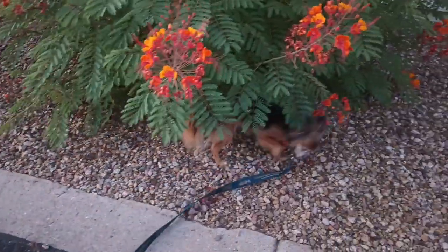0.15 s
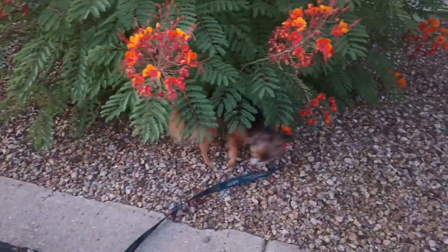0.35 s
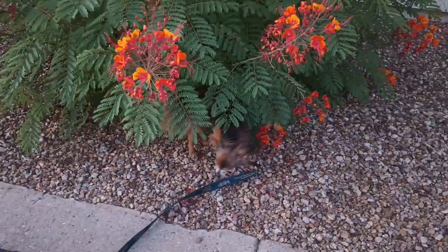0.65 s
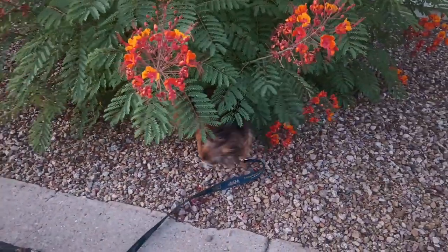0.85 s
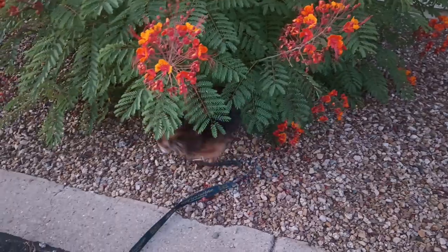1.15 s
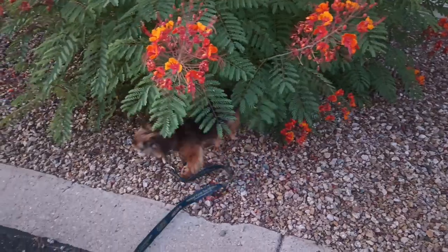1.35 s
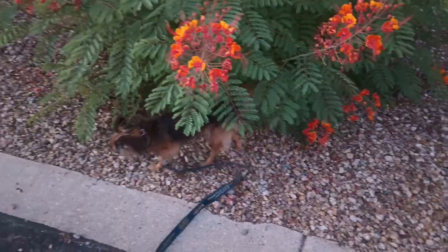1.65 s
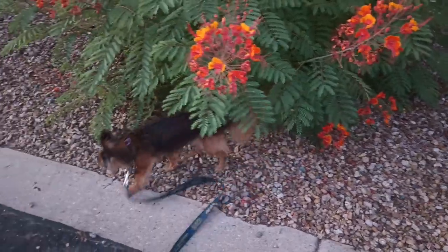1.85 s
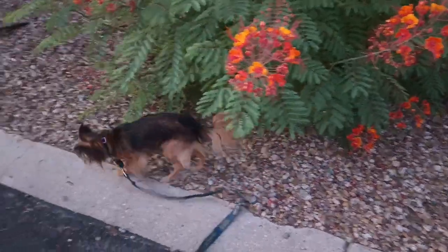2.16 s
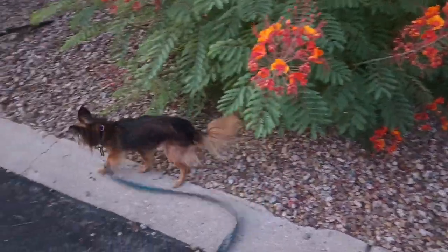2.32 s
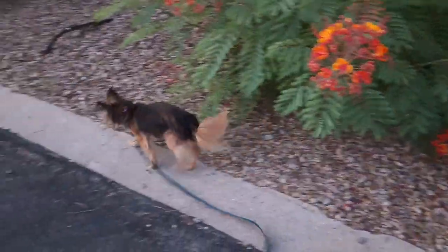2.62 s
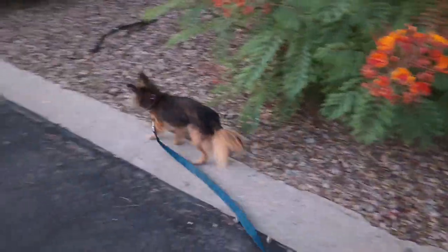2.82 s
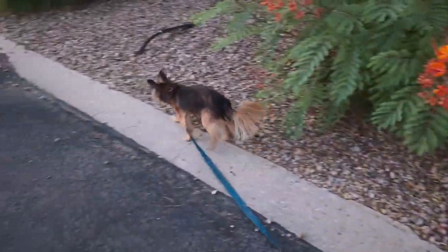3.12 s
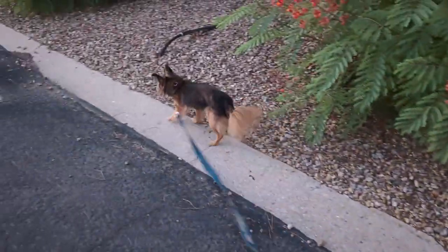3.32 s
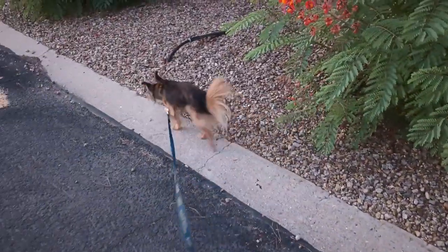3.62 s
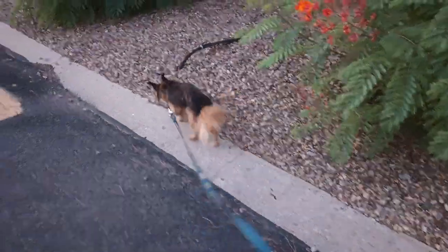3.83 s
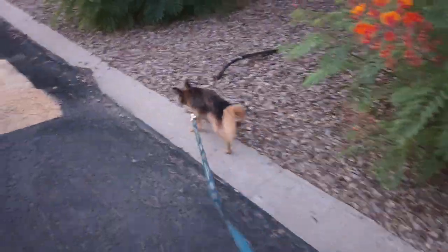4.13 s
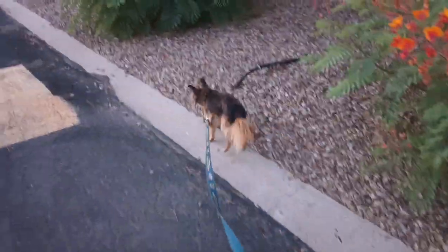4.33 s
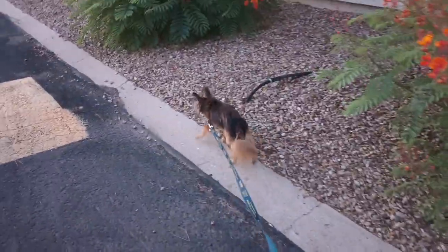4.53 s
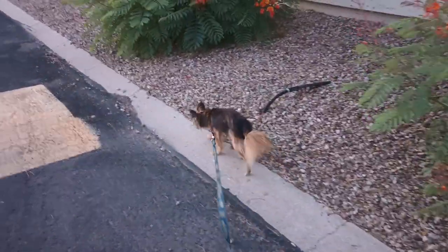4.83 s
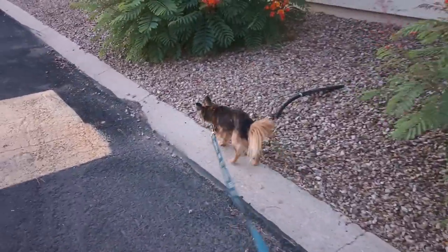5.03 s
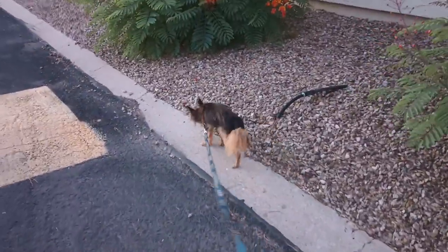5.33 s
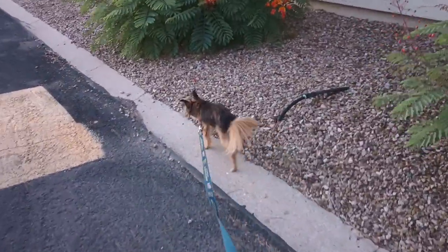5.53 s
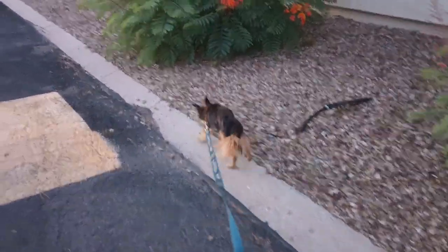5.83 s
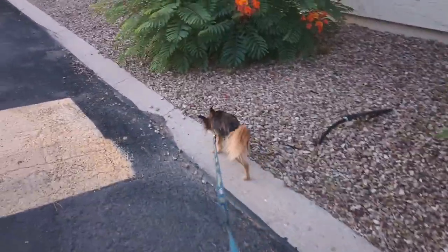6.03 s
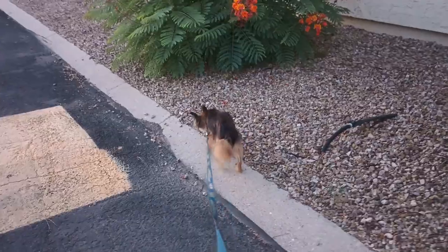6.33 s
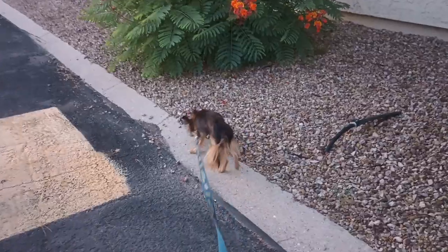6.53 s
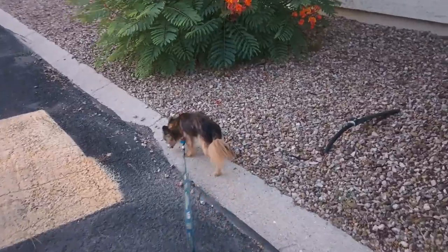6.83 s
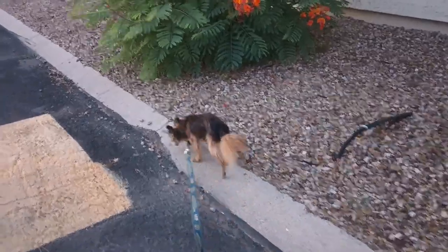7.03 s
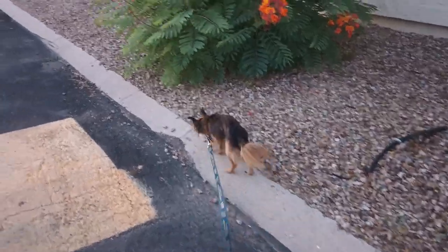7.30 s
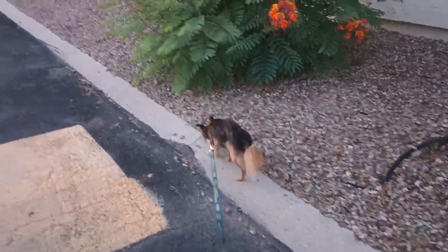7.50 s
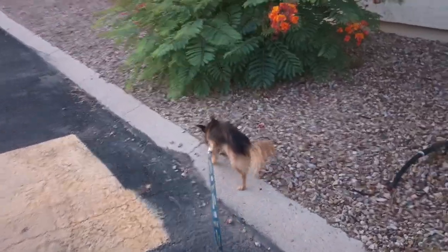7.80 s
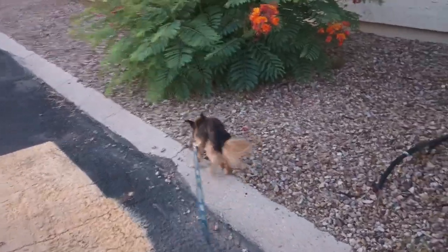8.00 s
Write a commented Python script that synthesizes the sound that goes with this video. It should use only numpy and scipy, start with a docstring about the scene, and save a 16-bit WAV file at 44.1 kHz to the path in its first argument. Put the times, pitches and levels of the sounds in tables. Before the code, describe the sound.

A small dog on a leash steps over gravel beside a quiet street, with sharp ticks of pebbles, claws and the leash clip and a light rustle. After about two seconds, wind starts buffeting the microphone with uneven low rumble and thumps. The collar tag rings faintly once, the ticks thin out, and the wind is loudest near the end. Far traffic and birds are barely audible.

```python
"""A breezy street, where a small dog on a leash steps from a gravel bed to the kerb. Wind leads: eddies
buffet the two microphone ports with rumble, flutter and thumps. Pebbles, claws and the leash clip tick
and bounce, stirred leaves and gravel rustle, a collar tag rings and shoes crush grit on asphalt.
Behind them, faint birds whistle and wheeze over a bed of far traffic."""
import sys
import numpy as np
from scipy import signal
from scipy.io import wavfile
from scipy.ndimage import uniform_filter1d

SR = 44100
rng = np.random.default_rng(int(sys.argv[2]) if len(sys.argv) > 2 else 0)


def transcribe(signal):
    """Save signal, clipped to [-1, 1], as a 16-bit WAV file at the path in sys.argv[1]."""
    frames = np.atleast_2d(signal).T
    limited = np.clip(frames, -1, 1)
    pcm = np.round(limited * 32767).astype(np.int16)
    wavfile.write(sys.argv[1], SR, pcm)


N = 359837


def from_db(db):
    """Decibels to gain."""
    return 10 ** (np.asarray(db) / 20)


def unit_rms(x):
    """Scale to an rms of one."""
    return x / np.sqrt(np.mean(x ** 2) + 1e-20)


def automation(rows):
    """Draw each column of a breakpoint table as a curve over the whole scene."""
    times, *columns = np.transpose(rows)
    return [np.interp(np.arange(N) / SR, times, column) for column in columns]


def eq_at(points, hz):
    """Read an EQ curve on a log-frequency axis."""
    freqs, levels = np.transpose(points)
    return np.interp(np.log(hz), np.log(freqs + 1), levels)


def band(x, low_hz, high_hz):
    """Butterworth band-pass."""
    sos = signal.butter(2, [low_hz, min(high_hz, 21000)], "band", fs=SR, output="sos")
    return signal.sosfilt(sos, x)


def resonance(x, hz, width_hz):
    """Two-pole peak of unit gain."""
    r = np.exp(-np.pi * width_hz / SR)
    gain = (1 - r * r) / 2
    return signal.lfilter([gain, 0, -gain], [1, -2 * r * np.cos(2 * np.pi * hz / SR), r * r], x)


def drift(rate_hz):
    """Smooth random modulator with an rms of one."""
    hop = 40
    r = np.exp(-2 * np.pi * hop * rate_hz / SR)
    slow = signal.lfilter([1], [1, -2 * r, r * r], rng.standard_normal(N // hop + 2002))[2000:]
    return np.interp(np.arange(N) / hop, np.arange(len(slow)), unit_rms(slow))


def uneven_hits(spread_db, shape):
    """Impulse strengths of either sign: mostly small, a few large."""
    return from_db(spread_db * np.minimum(rng.exponential(1, shape), 3)) * rng.choice([-1, 1], shape)


def panned(pan_db):
    """Constant-power left and right gains; pan is always left minus right."""
    pair = np.array([from_db(pan_db / 2), from_db(-pan_db / 2)])
    return pair / np.sqrt(np.mean(pair ** 2, axis=0))


# The dog's path across the stereo field: (time [s], left port delay [samples])
DOG_BEARING = [(0, 1), (1.2, -2), (2.2, -6), (2.8, -5), (3.7, 0), (5.2, 7), (6.2, 8), (7, 14), (8.16, 16)]

def place(out, start, sound, pan_db, left_only=0):
    """Mix in a panned one-shot, delayed between the ports by the dog's bearing."""
    lag = round(np.interp(start, *np.transpose(DOG_BEARING)))
    for port, gain, delay, part in zip(out, panned(pan_db), (lag, 0), (sound + left_only, sound)):
        i = round(start * SR) + delay
        port[i:i + len(part)] += gain * part[:N - i]


# The ride of the gusts: (time [s], level [dB], pan [dB])
GUSTS = [(0, -50.5, 32), (.12, -75, -6), (.7, -65.5, 13.5), (.92, -53.5, 7), (1.07, -67, 0), (2.06, -65, 0),
         (2.16, -42.5, 12), (2.58, -43, 13), (2.68, -56, 7), (2.9, -44, 33), (3.2, -53.5, 5),
         (3.32, -79, 19), (3.5, -52, 55), (3.62, -47.5, 22), (3.82, -65, -2.5), (3.91, -47, 22),
         (4.11, -76.5, -8), (4.27, -66, 1), (4.4, -38, -3), (4.6, -46.5, -2), (4.75, -56, 0.5),
         (4.85, -41.5, 8), (4.94, -43, 4), (5.0, -52, 1), (5.08, -43, -2), (5.4, -46, 0),
         (5.75, -55.5, 0.5), (6.0, -40, 7), (6.17, -62, -14), (6.24, -40, 8), (6.53, -41.5, 14),
         (6.62, -32, 14), (6.76, -37, -1.5), (6.9, -29, -6.5), (7.07, -31.5, -5), (7.18, -68, 7),
         (7.3, -24.5, 6.5), (7.55, -27.5, -3.5), (7.76, -45.5, 19), (7.84, -31, 4), (7.97, -38, 2),
         (8.05, -23, 11), (8.16, -41.5, -7.5)]
# Tone of the buffeting: (frequency [Hz], level [dB])
BUFFET_EQ = [(15, -53), (25, -13), (68, 12), (140, 8), (199, -7.5), (432, -25.5), (612, -28.5), (840, -65),
             (1100, -90), (1430, -86), (2420, -120)]
# The ride of the small, fast eddies: (time [s], level [dB])
EDDY_FLUTTER = [(0.0, -84.5), (2.04, -82), (2.36, -70), (2.39, -48), (2.5, -92), (4.34, -77), (4.39, -52.5),
                (4.61, -74.5), (6.07, -68.5), (6.45, -66.5), (6.48, -80.5), (6.68, -43.5), (6.73, -69),
                (6.95, -35), (7.0, -58), (7.07, -50), (7.2, -87), (7.32, -35), (7.54, -32.5), (7.73, -76.5),
                (7.79, -47), (7.82, -56.5), (7.86, -41.5), (7.93, -75.5), (8.05, -31.5), (8.16, -69)]

def wind(thumps, eddies_per_s=180, sway_db=7, bass_hz=90, split_hz=230):
    """Each port is struck by its own uneven train of eddies; large ones rumble, small ones flutter."""
    level_db, pan_db = automation(GUSTS)
    pan_db = pan_db + sway_db * drift(8)  # the wind swings between the ports
    flutter_db, = automation(EDDY_FLUTTER)
    edges = 25 * 2 ** np.arange(0, 5.5, 0.5)
    out = np.zeros((2, N))
    for port, gain, thump in zip(out, panned(pan_db), thumps):
        eddies = uneven_hits(4.6, (2, N)) * (rng.random(N) < eddies_per_s / SR)
        eddies += 0.029 * rng.standard_normal((2, N))
        large, small = np.zeros((2, N))
        for k, (low, high) in enumerate(zip(edges, edges[1:])):
            hz = np.sqrt(low * high)
            part = from_db(eq_at(BUFFET_EQ, hz)) * band(eddies[k % 2], low, high)
            if hz < bass_hz:  # faster wind makes smaller eddies, so the sub swells less
                part *= from_db(-0.1656 * (level_db + 40))
            if hz < split_hz:
                large += part
            else:
                small += part
        large, small = unit_rms(large), unit_rms(small)
        rumble = from_db(level_db + 0.5 * drift(4.1)) * large
        bursts = from_db(flutter_db - 2 + 4.9 * drift(28))
        shedding = uniform_filter1d(np.abs(large), size=300) ** 0.78  # strong eddies shed small ones
        port += gain * (rumble + bursts * shedding * small)
        port += from_db(-22.5) * uniform_filter1d(np.abs(thump), size=200) * small  # so do thumps
    return out


# The hardest single eddies: (time [s], level on the louder port [dB], pitch [Hz], pan [dB])
EDDY_THUMPS = [(0.054, -36, 100, 33), (0.954, -41.5, 118, 36), (2.143, -29, 127, 31), (2.241, -27, 119, 13),
               (2.327, -29, 152, 19), (2.39, -27, 247, 29), (2.398, -26.5, 109, -21), (2.441, -29, 150, 12),
               (2.717, -26, 126, 32), (2.763, -33, 100, 26), (2.873, -31.5, 117, 40), (2.986, -27, 128, 25),
               (3.097, -35, 91, -30), (3.222, -43.5, 112, 23), (3.521, -35, 98, 38), (3.583, -32, 105, 38),
               (3.657, -35, 97.5, 31), (3.689, -37, 110, 32), (3.903, -28.5, 91, 28),
               (4.049, -39.5, 91, -33), (4.401, -28.5, 155, 16), (4.413, -30, 131, -9),
               (4.515, -25, 135, -24), (4.657, -29, 104, 14), (4.818, -33, 112, -24), (4.86, -30, 131, 33),
               (4.917, -33.5, 120, -9), (5.088, -30, 117, -8), (5.184, -33, 116, 16),
               (5.376, -31, 137, -37), (5.476, -42, 212, 0), (5.581, -39.5, 125, 24),
               (5.651, -31.5, 118, 41), (5.889, -24.5, 153, 28), (5.999, -27, 158, 28),
               (6.054, -32.5, 119, -28), (6.234, -24, 150, 30), (6.305, -28, 158, 27),
               (6.436, -24.5, 179, 19), (6.611, -17.5, 158, 37), (6.687, -20, 142.6, 11),
               (6.748, -24.5, 176, -21), (6.861, -24.5, 150, -13), (6.904, -25, 150, -26),
               (6.956, -18, 186, -13), (7.058, -19.5, 205, -37), (7.131, -32, 202, 29),
               (7.301, -15.5, 130, 24), (7.322, -20.5, 171, 11), (7.397, -16, 154, -22),
               (7.456, -11.5, 140, 21.5), (7.48, -17.5, 140, 10), (7.542, -12.5, 233, 22),
               (7.608, -16.5, 206, -26), (7.785, -17.5, 306, 40), (7.844, -16, 151, 5),
               (7.988, -21, 161, -21), (8.051, -12, 112, 33)]

def wind_thumps(attack_cycles=0.35, release_cycles=0.66, glide=0.49):
    """One eddy hits a port: a pressure swing of about two cycles that builds fast and slows as it fades."""
    out = np.zeros((2, N))
    for (time, db, hz, pan_db), phase in zip(EDDY_THUMPS, rng.random(len(EDDY_THUMPS))):
        cycles = np.arange(-int(1.5 * SR / hz), int(3 * SR / hz)) * hz / SR
        swell = np.exp(-0.5 * (cycles / np.where(cycles < 0, attack_cycles, release_cycles)) ** 2)
        swing = swell * np.cos(2 * np.pi * (cycles - glide * cycles * np.tanh(cycles) + phase))
        start = time - 1.422 / hz - 0.0026  # pre-roll lands the crest near the cue
        place(out, start, from_db(db) / panned(pan_db).max() * swing, pan_db)
    return out


def through_ports(pressure, low_hz=61, high_hz=617):
    """The ports pass wind pressure only in a low band with steep edges."""
    pressure = signal.sosfilt(signal.butter(3, low_hz, "high", fs=SR, output="sos"), pressure)
    return signal.sosfilt(signal.butter(6, high_hz, fs=SR, output="sos"), pressure)


# Pebble, claw and clip hits:
# (time [s], level [dB], ring pitch [Hz], sparkle trim [dB], grit against click [dB], grit t60 [s])
CONTACTS = [(0.1281, -75, 6630, -10, -10, 0.055), (0.1814, -52, 6800, -3, -3, 0.051),
            (0.381, -59, 6100, 1, -2, 0.17), (0.848, -58, 5850, -11, -12, 0.045),
            (0.9008, -61, 5600, -26, -12, 0.055), (0.9702, -49.5, 6300, -9, -1.5, 0.14),
            (1.066, -59.5, 6200, -21, -5, 0.039), (1.2581, -41.5, 5870, 0, 2, 0.05),
            (1.2597, -34.5, 5700, -19, -17, 0.076), (1.3794, -59, 6340, -28, -19, 0.055),
            (1.399, -51.5, 5900, -22, -10, 0.041), (1.5267, -56, 5800, -4, -12, 0.035),
            (1.692, -53.5, 7180, -30, -12, 0.055), (1.7504, -59, 6650, -15, -5, 0.055),
            (1.7663, -41, 5660, -15, -8, 0.055), (1.7865, -46, 7740, -2, -5, 0.085),
            (1.805, -29, 6700, -9, -11, 0.088), (1.8535, -40, 6360, -6, -11, 0.068),
            (1.942, -60.5, 6130, -20, -12, 0.039), (2.0098, -50.5, 5170, -21, -10, 0.11),
            (2.0472, -54, 3800, -20, -5, 0.063), (2.073, -52, 6700, -12, -14, 0.072),
            (2.1106, -44, 7260, -4.5, -5, 0.084), (2.3463, -28.5, 6900, -7, -14, 0.039),
            (2.369, -36.5, 6600, -10, -8, 0.044), (2.4094, -55.5, 3750, -8, -16, 0.037),
            (2.5864, -49, 5500, -30, -12, 0.038), (2.6386, -42.5, 7500, -6, -8, 0.053),
            (2.6616, -55, 7880, -6, -10, 0.033), (2.824, -34.5, 6780, -4, -11, 0.069),
            (2.8676, -49.5, 6540, -27, -9, 0.055), (2.9074, -49.5, 6430, -11, -6, 0.067),
            (3.001, -71, 4530, -32, -10, 0.055), (3.075, -55, 4560, -8, -10, 0.059),
            (3.0916, -41.5, 3740, -11, 1, 0.034), (3.14, -39, 7900, -13, -10, 0.073),
            (3.3384, -54, 4340, 6.5, -12, 0.055), (3.4007, -52, 5470, -18, -4, 0.061),
            (3.4457, -55, 7150, -9, -16, 0.045), (3.492, -39.5, 4160, -29, -21.5, 0.072),
            (3.5588, -33.5, 5450, -32, -23, 0.055), (3.5928, -57, 6360, -37, -18, 0.048),
            (3.8859, -39.5, 7600, -17, -13, 0.068), (3.944, -55.5, 6760, -23, -7, 0.041),
            (3.9833, -54, 7840, -11, -3, 0.065), (4.5194, -46.5, 6200, -8, -6, 0.028),
            (4.944, -56, 7840, -4, -4, 0.12), (5.284, -61.5, 5200, -19, -11, 0.055),
            (5.5375, -51, 7750, -11, -8, 0.045), (5.9, -51, 3380, -19, -9, 0.059),
            (6.0406, -54.5, 7950, -4, -4.5, 0.065), (6.099, -62, 7850, 6, -10, 0.055),
            (6.1857, -59, 7420, -6, -10, 0.055), (6.6557, -58, 6270, 0.5, -6, 0.051),
            (6.8437, -51.5, 2900, -6, -15.5, 0.045), (6.897, -61, 3150, -24, -9, 0.066),
            (6.969, -62.5, 2980, 2, -10, 0.055), (6.9747, -44.5, 6100, 3.5, -11, 0.053),
            (7.0693, -47, 4970, -13, -6, 0.078), (7.3305, -45.5, 6850, -8, -8.5, 0.037),
            (7.3706, -47, 7490, -12, -16.5, 0.058), (7.419, -68, 3230, -5, -14, 0.079)]

def contact_ticks(lead_s=0.0068, click_s=0.0011, bounces_per_s=77, upper_range_hz=(8600, 11200)):
    """A hard contact with bounces and grit: a broad crack, two short rings and a sparkle on the right."""
    out, t = np.zeros((2, N)), np.arange(4000) / SR
    since_hit = np.maximum(t - lead_s, 0)
    click = (t > lead_s) * np.exp(-since_hit / click_s)
    lead_in = np.minimum(t / lead_s, 1) ** 1.3  # stones shift and grind before the hit
    for time, db, ring_hz, sparkle_db, grit_db, t60 in CONTACTS:
        noise = rng.standard_normal((3, len(t)))
        chance = noise[1]
        upper_hz = np.interp(chance[-1], (-1.5, 1.5), upper_range_hz)  # varies from stone to stone
        pan_db = -5.5 + 4 * chance[-2]
        touches = np.abs(chance) < bounces_per_s / SR
        bounces = signal.lfilter([3.2], [1, -0.97], touches * 1.0)  # about a millisecond each
        grit = from_db(grit_db - 60 * (since_hit / t60) ** 1.46) * (0.5 + bounces) * lead_in
        burst = noise[::2] * (click + grit)
        for gap in 8 + np.argsort(chance[:40])[:2]:  # echoes off nearby stones comb the colour
            burst = burst + 0.26 * np.pad(burst, ((0, 0), (gap, 0)))[:, :len(t)]
        crack = band(band(burst, 3400, 11900), 1600, 13000)
        rings = resonance(burst, ring_hz, ring_hz / 9)
        rings += from_db(-3) * resonance(burst, upper_hz, upper_hz / 12)
        sparkle = resonance(burst, 15100, 1100)
        crack, rings, sparkle = [part / np.abs(part[0]).max() for part in (crack, rings, sparkle)]
        body = from_db(db - 6.5) * (crack + from_db(2.5) * rings)
        start = time - 0.0048
        place(out, start, body[0], pan_db, left_only=body[1])
        place(out, start, from_db(db + sparkle_db + 7) * sparkle[0], pan_db - 16)
    return out


# Leaves and gravel stirred by dog and leash: (time [s], body level [dB], treble level [dB])
GROUND_STIR = [(0, -72.5, -83), (.22, -87, -89), (.85, -93, -92), (1.38, -75, -84.5), (1.73, -93, -89.5),
               (1.88, -73, -85), (2.16, -89.5, -93), (2.52, -71, -88), (2.8, -100.5, -104),
               (2.92, -67.5, -70), (3.04, -70, -81), (3.2, -84.5, -108), (3.43, -79, -100),
               (3.56, -95, -105), (4.25, -91.5, -95), (4.75, -81, -81.5), (5.1, -87.5, -96),
               (5.84, -89, -96), (6.3, -87.5, -75), (6.64, -92.5, -100), (7.27, -97.5, -104),
               (7.39, -78, -71), (7.46, -73.5, -76), (7.52, -88, -87), (7.8, -79.5, -73), (8.0, -96, -100),
               (8.16, -90, -101)]

def ground_rustle(snaps_per_s=700, q=27, strays_per_s=18, off_gravel_s=2.3):
    """Clumps of tiny snaps, each ringing briefly at the pitch of its pebble or leaf."""
    level_db, treble_db = automation(GROUND_STIR)
    sizes = uneven_hits(1.8, N)
    snaps = sizes * (rng.random(N) < snaps_per_s * from_db(4 * drift(20)) / SR)
    pitch_index, hiss = rng.integers(0, 12, N), rng.standard_normal((2, N))
    rings = np.zeros((2, N))
    for k, hz in enumerate(np.geomspace(2900, 7600, num=12)):
        flicker = from_db(7 * drift(19))
        rings += (-1) ** k * flicker * resonance(snaps * (pitch_index == k) + hiss, hz, hz / q)
    body = unit_rms(rings) * from_db(level_db - 2)
    air = (snaps + 0.63 * hiss) * from_db(5.7 * drift(25))
    air = band(air, 3500, 18000) + from_db(15) * resonance(air, 15200, 800)
    treble = unit_rms(air) * from_db(treble_db + 7.5)
    # lone pebbles click until the dog is off the gravel
    strays = (rng.random(N) < strays_per_s / SR) * (np.arange(N) < off_gravel_s * SR)
    stray_envelope = signal.lfilter([1], [1, -0.98], strays * from_db(level_db + 16) * np.abs(sizes))
    body += band(stray_envelope * rng.standard_normal(N), 2800, 14000)
    out = body * panned(0.55)[:, None] + treble * panned(-19)[:, None]
    lag = np.round(automation(DOG_BEARING)[0]).astype(int)
    out[0] = out[0][np.clip(np.arange(N) - lag, 0, N - 1)]
    return out


TAG_HITS = [(0.127, -71), (3.343, -56.5), (3.364, -56), (3.38, -60), (3.4, -58), (3.419, -68)]
# Ringing modes of the tag: (frequency [Hz], level [dB], t60 [s])
TAG_MODES = [(3950, -12, 0.11), (5300, -16, 0.22), (6400, -3, 0.047), (7640, -5, 0.073), (9250, -8, 0.06),
             (9900, -21, .05), (10780, 9, 0.046), (11670, -27, .05), (14700, 0, .05)]

def collar_tag(spread_db=2.6):
    """Every touch rings each mode of the tag with its own strength and a slight detune."""
    out, t = np.zeros((2, N)), np.arange(5000) / SR
    for (time, db), accents in zip(TAG_HITS, rng.normal(0, spread_db, (len(TAG_HITS), len(TAG_MODES)))):
        ring = np.zeros(len(t))
        for (hz, mode_db, t60), accent_db in zip(TAG_MODES, accents):
            decay = from_db(db + mode_db + accent_db - 60 * t / t60)
            ring += decay * np.sin(2 * np.pi * hz * (1 + 0.0057 * accent_db) * t)
        brushing = unit_rms(band(rng.standard_normal(len(t)), 60, 500))  # tag and clip keep touching
        place(out, time, ring * (1 + 0.48 * brushing), pan_db=-7)
    return out


# Soles set down on asphalt: (time [s], level [dB], decay time [s])
FOOTFALLS = [(4.363, -70, 0.093), (4.791, -75, 0.033), (5.455, -68, 0.039), (5.535, -75, 0.036),
             (5.616, -87, 0.033), (5.743, -76, 0.034), (5.956, -73, 0.022), (6.962, -70.5, 0.036)]

def shoe_scuffs():
    """Grit crushed under a sole: dense, rough noise, duller than the gravel."""
    out = np.zeros((2, N))
    for time, db, decay_s in FOOTFALLS:
        noise = rng.standard_normal((3, 6000))
        age = np.arange(6000) / SR / decay_s
        grit = noise[:2] * noise[2] ** 2
        sole = from_db(12) * band(grit, 300, 900)
        envelope = np.minimum(age * 8, 1) * np.exp(-age ** 3)
        scuff = from_db(db) * unit_rms(band(grit, 400, 2900) + sole) * envelope
        place(out, time, scuff[0], pan_db=-3, left_only=2.1 * scuff[1])
    return out


# Short whistled notes: (centre time [s], level [dB], pitch [Hz], core length [s])
BIRD_NOTES = [(1.3, -84, 3700, 0.019), (1.627, -83.5, 3760, 0.019), (2.032, -81, 2020, 0.029),
              (2.119, -73.5, 2015, .025), (2.2, -89, 3720, .04), (2.206, -74, 2060, 0.034),
              (2.297, -78.5, 1970, 0.024), (2.475, -81.5, 2050, 0.031), (3.271, -87, 1100, 0.058),
              (3.306, -75.5, 982, 0.0656), (4.925, -75, 4880, 0.034), (5.01, -88, 3630, 0.029),
              (6.39, -85, 4840, 0.019)]

def bird_whistles(blur_hz=70):
    """Far notes blurred by the air: a sine in a halo of narrow noise, faded in and out."""
    out = np.zeros((2, N))
    for time, db, hz, core_s in BIRD_NOTES:
        t = np.arange(int(core_s * 2.6 * SR)) / SR
        blur = unit_rms(resonance(rng.standard_normal(8000), hz, blur_hz)[-len(t):])
        note = np.hanning(len(t)) * (1.9 * np.sin(2 * np.pi * hz * t) + blur)
        place(out, time - t[-1] / 2, from_db(db) * note, pan_db=0)
    return out


# A thin, repeated call: (start [s], end [s], level [dB], mid lift [dB])
WHEEZE_CALLS = [(4.517, 5.01, -84, 9), (6.191, 6.515, -80, -3), (7.544, 7.966, -79.5, 2.5)]
# Colour of the call: (frequency [Hz], width [Hz], level [dB])
WHEEZE_PEAKS = [(2400, 85, -8), (3070, 27, -2), (4270, 45, 2), (5350, 45, -2), (6200, 70, 1),
                (7700, 140, -2.5), (10240, 580, 9.5), (11300, 600, 5), (15070, 680, 10)]

def bird_wheeze(rasp_db=7.5):
    """A bird on the right wheezes in narrow noise bands, each flickering on its own."""
    out = np.zeros((2, N))
    for hz, width, band_db in WHEEZE_PEAKS:
        flicker = from_db(rasp_db * drift(6.8))
        for start, end, db, lift_db in WHEEZE_CALLS:
            breath = rng.standard_normal(SR // 2)[:int((end - start) * SR)]
            tone = unit_rms(resonance(resonance(breath, hz, width), hz, 3 * width))
            envelope = np.hanning(len(breath)) * flicker[int(start * SR):][:len(breath)]
            gain = from_db(db + band_db + lift_db * (3800 < hz < 5600) - 10)
            place(out, start, gain * envelope * tone, pan_db=-hz / 900)
    return out


# Tone of the traffic and hiss: (frequency [Hz], level [dB])
STREET_EQ = [(18, -41), (30, -12), (86, 3.5), (120, 1), (279, -5.5), (435, -13.5), (551, -9), (883, -12),
             (1840, -24), (2660, -27.5), (6150, -32.5), (8200, -48.5), (10700, -42.5), (12500, -56.5),
             (15800, -22)]
# Stereo lean of that bed: (frequency [Hz], pan [dB])
STREET_PAN = [(60, 3.5), (240, -2), (950, 0), (3770, -1), (15000, -1.5)]

def far_traffic(level_db=-69, wander_db=2.35):
    """Far traffic and microphone hiss: wandering third-octave noise bands, unrelated left and right."""
    out, edges = np.zeros((2, N)), 30 * 2 ** np.arange(0, 9.3, 1 / 3)
    white, shared_swell = rng.standard_normal((2, 2, N)), drift(0.85)
    for k, (low, high) in enumerate(zip(edges, edges[1:])):
        hz = np.sqrt(low * high)
        gain = from_db(eq_at(STREET_EQ, hz) + wander_db * (shared_swell / 2 + drift(4.4)))
        out += gain * band(white[k % 2], low, high) * panned(eq_at(STREET_PAN, hz))[:, None]
    return from_db(level_db) * unit_rms(out)


def scene(bed_top_hz=15950):
    """Wind and ticks up front, over a bed whose treble ends a little below that of the ticks."""
    thumps = wind_thumps()
    bed = far_traffic() + ground_rustle() + bird_whistles() + bird_wheeze()
    bed += collar_tag() + shoe_scuffs()
    bed = signal.sosfilt(signal.cheby2(16, 45, bed_top_hz, fs=SR, output="sos"), bed)
    return bed + through_ports(wind(thumps) + thumps) + contact_ticks()


def record(dry):
    """A steep high cut on the whole mix."""
    return signal.sosfilt(signal.cheby2(12, 70, 16830, fs=SR, output="sos"), dry)


dry = scene()
out = record(dry)
transcribe(out)
```